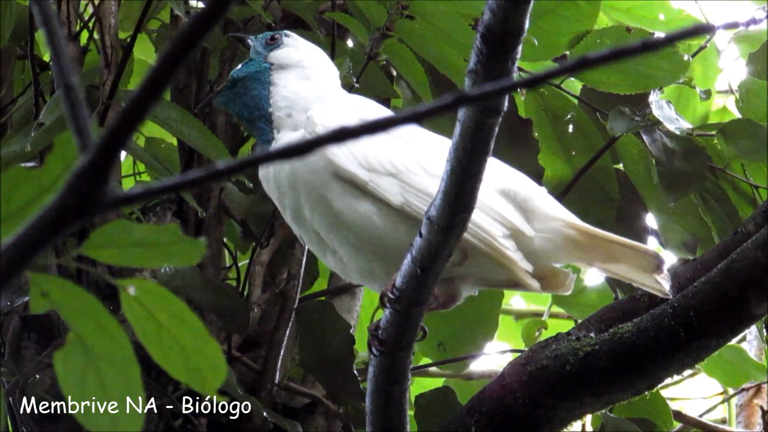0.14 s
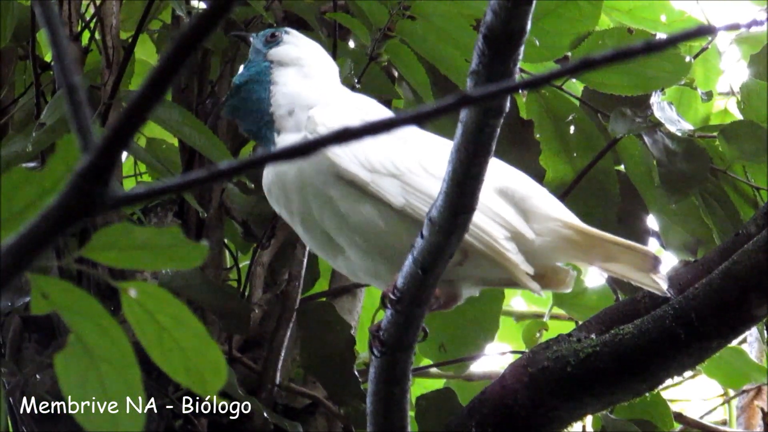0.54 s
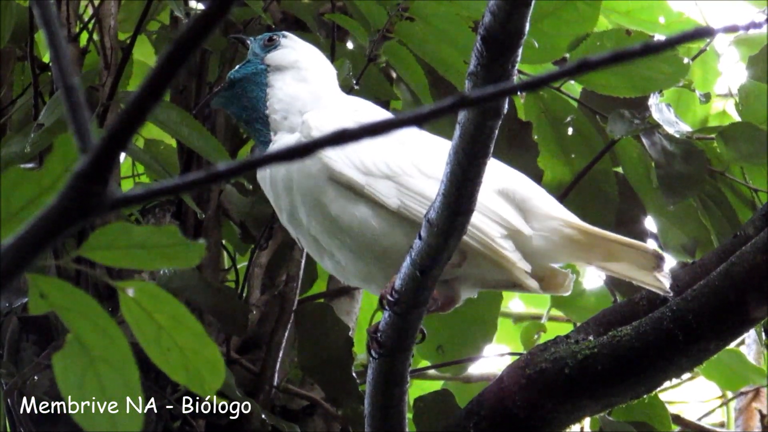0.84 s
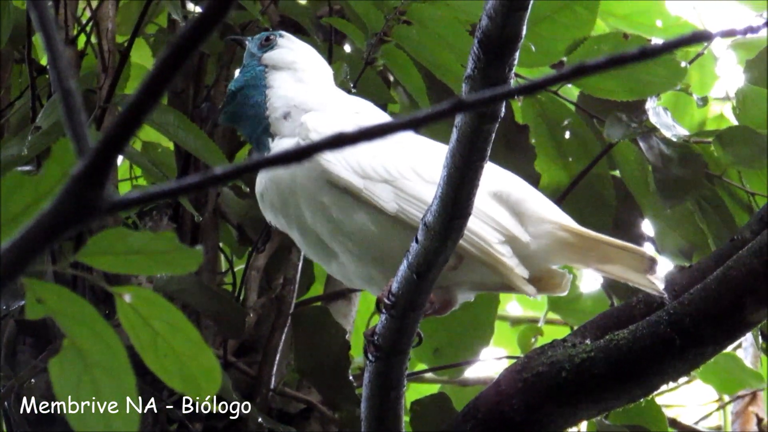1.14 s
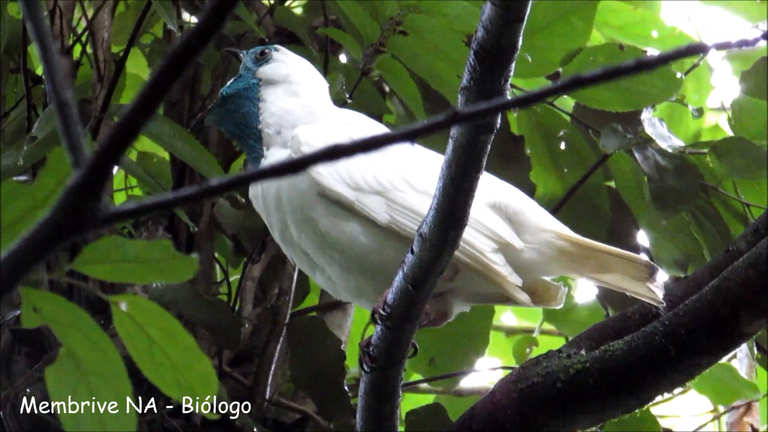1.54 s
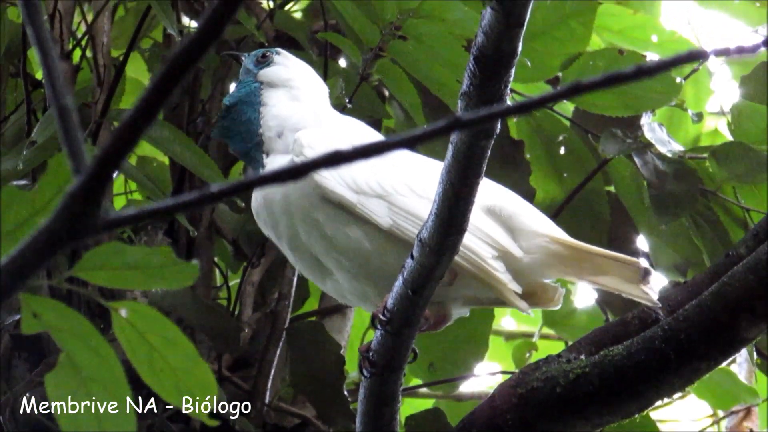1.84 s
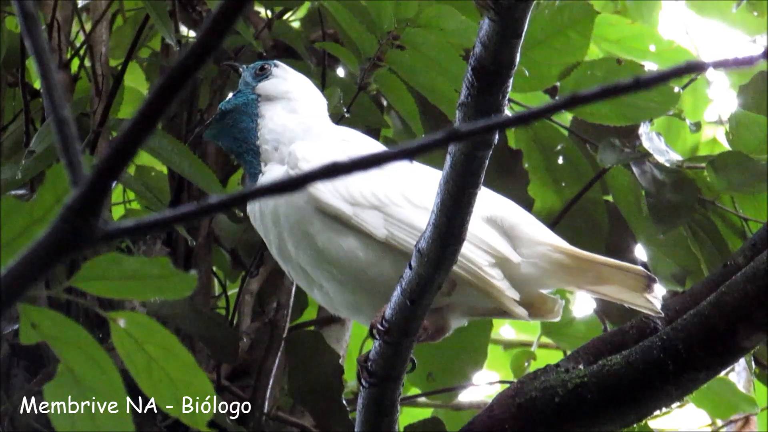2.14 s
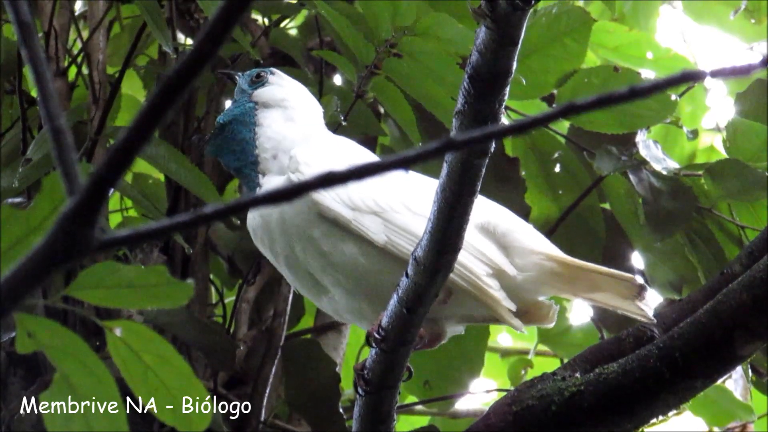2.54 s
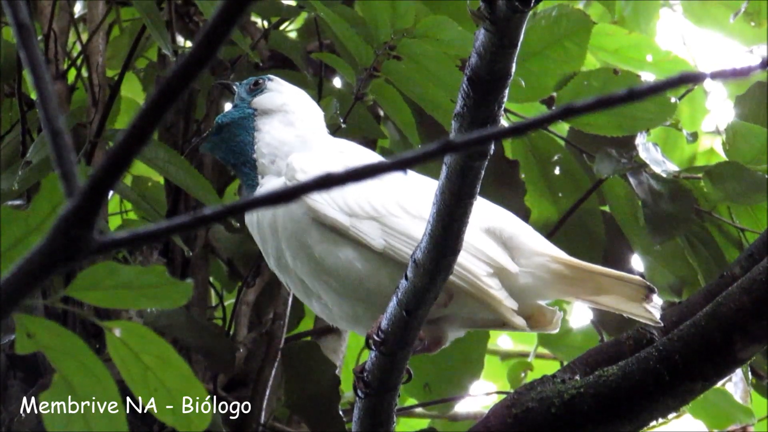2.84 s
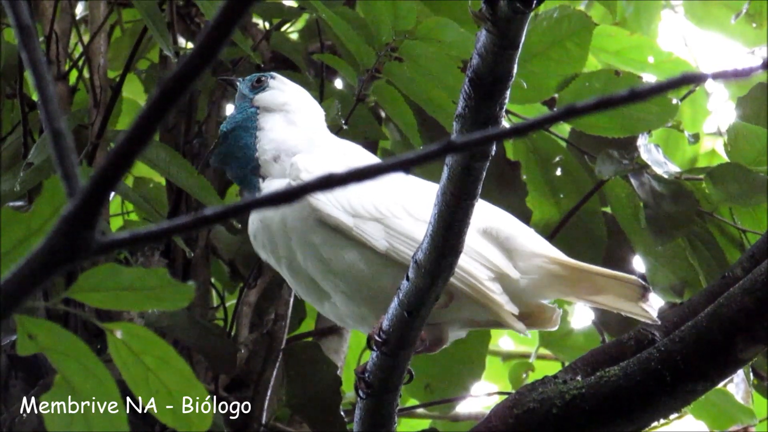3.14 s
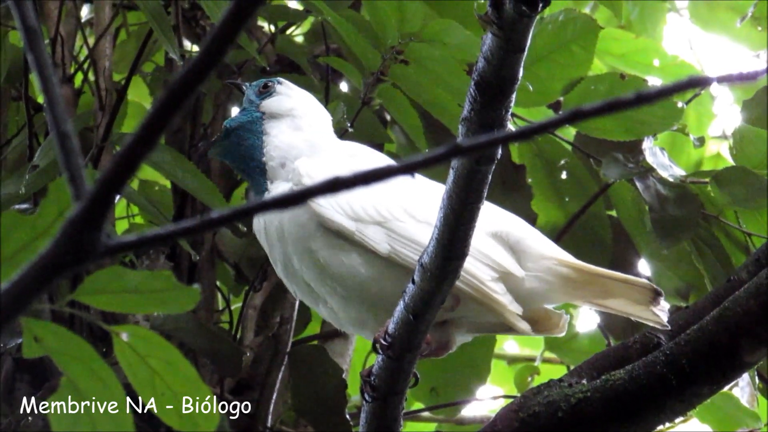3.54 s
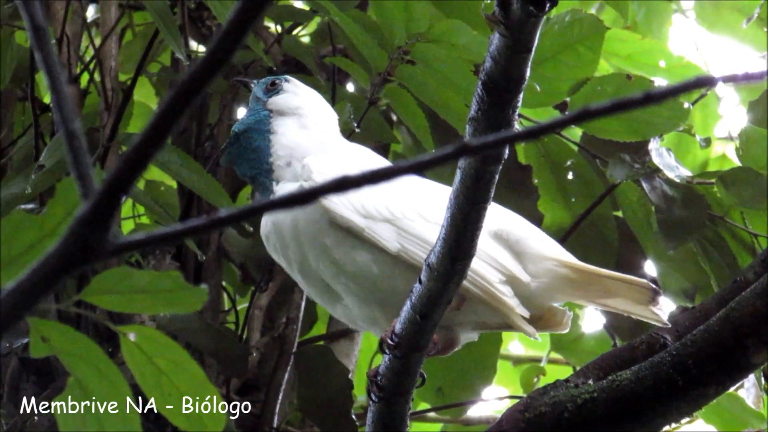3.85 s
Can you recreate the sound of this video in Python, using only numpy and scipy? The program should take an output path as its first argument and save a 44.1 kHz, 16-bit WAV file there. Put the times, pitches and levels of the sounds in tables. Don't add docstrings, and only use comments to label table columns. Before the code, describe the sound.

Close in a forest, a bellbird repeats ringing two-part calls, throbbing clang into short clear whistle, with quick echoes. Faint gliding song, distant chirps, dove coos and breezy leaf hiss lie underneath, captured in wide stereo.

```python
import sys
import numpy as np
from scipy import signal
from scipy.fft import rfft, irfft
from scipy.io import wavfile
from scipy.ndimage import uniform_filter1d

SR = 44100
rng = np.random.default_rng(int(sys.argv[2]) if len(sys.argv) > 2 else 0)


def put_to_file(sound):
    columns = np.atleast_2d(sound).T
    safe = np.clip(columns, -1, 1)
    whole_steps = np.round(safe * 32767)
    wavfile.write(sys.argv[1], SR, whole_steps.astype(np.int16))


def voltage_ratio(decibels):
    exponent = np.asarray(decibels, float) / 20
    return 10 ** exponent


N = 176400
LEAD = 22050
MID_TO_SIDES = np.array([[1], [-1]])
NEAR_ALIKE, FAR_ALIKE = 0.6, 0.45


def clock():
    return (np.arange(N + LEAD) - LEAD) / SR


def rms_one(x):
    return x / np.sqrt(np.mean(x ** 2) + 1e-20)


def along(points, s):
    level_db = np.interp(s, *np.transpose(points), left=-150, right=-150)
    return uniform_filter1d(voltage_ratio(level_db), size=220)


def coloured(spectrum, white):
    log_hz = np.log(np.fft.rfftfreq(white.shape[-1], 1 / SR) + 1)
    at_hz, level_db = np.transpose(spectrum)
    gain = voltage_ratio(np.interp(log_hz, np.log(at_hz), level_db))
    return irfft(rfft(white) * gain, white.shape[-1])


def drift(rate_hz):
    lowpass = signal.butter(2, rate_hz, fs=SR, output="sos")
    return rms_one(signal.sosfilt(lowpass, rng.standard_normal(N + LEAD)))


def panned(pan_db):
    return voltage_ratio([[pan_db / 2], [-pan_db / 2]])


def trees(x, t60_s, alike):
    s = np.arange(SR) / SR
    onset = np.minimum(s / 0.0057, 1)
    mid, side = rng.standard_normal((2, SR)) * voltage_ratio(-60 * s / t60_s) * onset
    tail = np.sqrt(1 + alike) * mid + np.sqrt(1 - alike) * side * MID_TO_SIDES
    tail = tail / np.sqrt(np.sum(tail ** 2) / 2)
    return signal.fftconvolve(x[None], tail, axes=1)[:, :len(x)]


def glides(rows, ease, third_db, rough_db, second_db, order=1.3):
    out, rough = np.zeros(N + 2 * LEAD), np.tanh(drift(170.0))
    for start_s, length_s, from_hz, to_hz, level_db in rows:
        i = int(start_s * SR) + LEAD
        u = np.linspace(0, 1, int(length_s * SR))
        bend = ease * (to_hz > from_hz) * np.sin(2 * np.pi * u) / (2 * np.pi)
        phase = 2 * np.pi * np.cumsum(from_hz + (to_hz - from_hz) * (u - bend)) / SR
        swell = np.sin(np.pi * u ** order) ** 0.7
        gain = voltage_ratio(level_db + 8.0 + rough_db * rough[i // 2:i // 2 + len(u)]) * swell
        tone = np.sin(phase) + voltage_ratio(second_db) * np.sin(2 * phase) + voltage_ratio(third_db) * np.sin(3 * phase)
        out[i:i + len(u)] += gain * tone
    return out[:N + LEAD]


def air():
    # freq_hz, level_db (per Hz)
    bed_spectrum = [(25, -32.5), (65, -2), (150, -6.5), (1900, -16.5), (4500, -6), (6800, -10), (9500, -25),
                    (15500, -42)]
    # freq_hz, likeness (0 to 1)
    likeness = [(40, .998), (85, .993), (125, .8), (300, .6), (1000, .62), (10000, .5)]
    # time_s, level_db
    breeze = [(-.5, -5), (.3, 11), (.6, -0.5), (1.6, 5), (2.0, 1.5), (2.9, -6.5), (3.4, 3.5), (3.6, 9.5),
              (4.1, 6)]
    mid, side = coloured(bed_spectrum, rng.standard_normal((2, N + LEAD)))
    mid = coloured([(hz, 10 * np.log10(1 + c)) for hz, c in likeness], mid)
    side = coloured([(hz, 10 * np.log10(1 - c)) for hz, c in likeness], side)
    both = voltage_ratio(-47) * rms_one(mid + side * MID_TO_SIDES)
    rumble = coloured([(1100, 0), (1800, -60)], both)
    hiss = both - rumble
    gusts = along(breeze, clock()) * voltage_ratio(1.3 * drift(4.7))
    return rumble * voltage_ratio(0.29 * drift(7.5)) + hiss * gusts


def dove():
    # start_s, length_s, from_hz, to_hz, level_db
    coos = [
        (-.1, 0.37, 460.3, 437.8, -52.5),
        (.25, 0.16, 429, 418, -59),
        (.97, 0.49, 445.5, 430, -59.5),
        (1.65, 0.42, 435.6, 432.5, -59),
        (2.03, 0.22, 409, 354, -64.5),
        (2.73, 0.23, 458.8, 434, -60.5),
        (3.82, 0.23, 359, 436, -53.5),
    ]
    return voltage_ratio(-4.0) * glides(coos, ease=0, third_db=-38.5, rough_db=0.55, second_db=-43.0)


def far_chips():
    # start_s, length_s, from_hz, to_hz, level_db
    chips = [(.02, 0.034, 7000, 5050, -44), (.06, 0.067, 4200, 3284, -50.5), (.165, .02, 7000, 5090, -44),
             (.25, 0.036, 6180, 4250, -84.5), (.44, .03, 6600, 5780, -48), (.88, 0.027, 6800, 5550, -56),
             (.91, 0.062, 6710, 5200, -49.5), (1.055, 0.044, 8140, 5490, -46),
             (1.42, 0.014, 7670, 5740, -50), (1.615, 0.013, 8180, 5730, -49.5),
             (1.73, .03, 8750, 4790, -47), (1.82, 0.041, 7050, 6410, -42),
             (1.855, 0.033, 6660, 6150, -35.5), (2.05, 0.063, 8040, 4650, -45),
             (2.1, .04, 8160, 6620, -41.5), (2.16, 0.038, 7810, 3980, -46),
             (2.64, 0.053, 7000, 4700, -45.5), (2.7, 0.034, 7170, 4890, -59),
             (2.93, 0.023, 6230, 5170, -56), (3.085, 0.03, 7280, 5310, -41),
             (3.32, .035, 6420, 4720, -46.5), (3.36, 0.034, 3115, 2380, -54.5),
             (3.38, 0.023, 7290, 4130, -49), (3.47, 0.021, 6960, 4640, -60),
             (3.515, 0.029, 7415, 1916, -48), (3.57, 0.049, 6860, 2157, -65),
             (3.785, 0.034, 7010, 4690, -39), (3.97, 0.015, 4900, 2377, -44),
             (0.26, 0.027, 7650, 6640, -61.5), (0.592, 0.031, 7000, 4520, -47),
             (0.759, .015, 8500, 7500, -75), (1.014, 0.026, 8000, 5900, -56),
             (2.096, 0.016, 14600, 9400, -61.5), (2.871, 0.0099, 1025, 824, -57),
             (2.978, 0.015, 7540, 7000, -57), (2.988, 0.029, 4980, 4440, -61.5),
             (3.32, 0.047, 9170, 8400, -57), (3.502, 0.025, 10120, 8800, -57.5),
             (3.678, 0.036, 10370, 8520, -52.5), (3.945, 0.027, 9670, 9000, -58.5),
             (3.98, 0.028, 8640, 8356, -50), (.03, 0.064, 6900, 6980, -49), (.24, .07, 4740, 4550, -57.5),
             (.1, 0.11, 2260, 1740, -63.5), (3.47, 0.082, 6630, 7550, -60.5)]
    return glides(chips, ease=0, third_db=-74.5, rough_db=4, second_db=-30, order=0.65)


def songbird():
    # start_s, length_s, from_hz, to_hz, level_db
    song_notes = [(.83, 0.06, 4155, 4000, -56.5), (.875, 0.066, 3900, 3527, -40),
                  (1.03, 0.15, 4460, 3160, -38.5), (1.24, 0.14, 4150, 5650, -32.5),
                  (1.455, 0.1, 4200, 5670, -31.5), (1.43, 0.044, 4320, 4184, -37.5),
                  (1.62, 0.067, 3830, 2880, -42.5), (1.683, .035, 4200, 3810, -37),
                  (1.7, 0.058, 3950, 4380, -33.5), (2.0, 0.072, 6120, 5630, -42.5),
                  (2.17, 0.052, 2750, 2740, -46), (2.21, 0.028, 3270, 2510, -43),
                  (2.96, 0.09, 4180, 3985, -57)]
    return glides(song_notes, ease=1.0, third_db=-44.5, rough_db=5.4, second_db=-35.5)


def clang_tone(s, hz, beat, octave_phase, wobble, waver, rasp):
    # offset (in throb rates, rounded to the nearest whole number, halves to even,
    # so -2.5 and 2.5 sound at -2 and 2), level_db
    clang_lines = [(-2.5, -17.5), (-2, -8.5), (-1, 1.5), (0, -1), (1, -10), (2.5, -24.5)]
    scoop_hz = 56.7 * np.clip((-s - 0.01) / 0.02, 0, 1)
    phase = 2 * np.pi * 1583.3 * hz / 3140 * s - 2 * np.pi * np.cumsum(scoop_hz) / SR
    body = 0
    for offset, level_db in clang_lines:
        k = round(offset)
        line_db = level_db + 1.2 * rng.standard_normal()
        body = body + voltage_ratio(line_db) * np.cos(phase + k * beat + 0.46 * (k + 0.5) ** 2)
    dip_db = -8 * np.exp(-((s - 0.029) / 0.024) ** 2)
    octave = voltage_ratio(-4 + dip_db + 1.2 * wobble) * (1 + 0.34 * np.cos(beat + 1.52))
    octave = octave * np.sin(octave_phase + 0.45 * np.sin(beat) + waver)
    throb = ((1 + 0.7 * np.cos(beat)) / 1.15) ** 1.1
    hiss_fade = voltage_ratio(-17 - 114 * np.maximum(s + 0.023, 0))
    hiss = hiss_fade * rasp * voltage_ratio(0.92 * wobble) * (0.5 + 1.55 * throb) * np.clip(s / 0.0061 + 8, 0, 1)
    return voltage_ratio(0.5 * waver - 6.0) * body + octave / 2 + hiss / 2


def whistle_tone(after_s, octave_phase, blurs):
    # multiple, level_db
    overtones = [(2, -31), (3, -38), (4, -43)]
    growth = np.clip((after_s + 0.057 - 0.015) / 0.072, 0.15, 2)
    edge = 0
    for (k, level_db), blur in zip(overtones, blurs):
        edge = edge + voltage_ratio(level_db + 3.5 * blur) * np.sin(k * octave_phase + 0.57 * blur)
    return np.sin(octave_phase) + growth * edge


def bellbird():
    # start_s (of the strongest throb), clang_db, whistle_db, whistle_hz, whistle_delay_s
    calls = [
        (-.19, -9, -4.5, 3144, 0.17),
        (0.5, -11, -6.5, 3120, .15),
        (1.177, -12.5, -6.5, 3136, .15),
        (1.794, -12, -6.5, 3127, .15),
        (2.415, -11, -6, 3130, .15),
        (3.109, -11, -7.5, 3131, 0.15),
        (3.736, -11.5, -5.5, 3150, 0.14),
    ]
    clang_fades = [10, 30, 16, 8.3, 4.7, 21, 25]
    end_bends = [3.3, 7.5, 8.5, 2.4, 2.4, 16.7, 1.3]
    releases = [1.016, 1.095, 1.01, 1.28, 1.16, 0.98, 1.07]
    whistle_returns = [(-20.5, -14.5, -57, -28.5), (-60, -17.5, -39, -30.5), (-17.5, -17, -57, -31),
                       (-40, -32, -28.5, -35.5), (-43.5, -17.5, -52, -31), (-20, -16, -23, -34),
                       (-45.5, -18.5, -32, -30)]
    # delay_s, pan_db, clang_db
    banks = [
        (0.043, -7, -11),
        (0.094, -1.5, -18.5),
        (0.15, 0, -26.5),
        (0.23, -4, -29),
    ]
    # time_s, throbs before the strongest
    first_throbs = [(-.1, -7), (-.057, -4), (-.042, -3), (-.025, -2), (-.0148, -1), (0, 0)]
    # time_s, level_db
    clang_shape = [(-.064, -61), (-.054, -23.5), (-.034, -13), (-.018, -4), (0, -2), (.03, -3.5),
                   (.085, -7.5), (.125, -23.5), (.16, -41.5)]
    # time_s, level_db
    whistle_shape = [(-.08, -38), (-.05, -13), (-.032, -2), (-.014, -0.3), (0, 2), (.024, -0.5), (.048, -6),
                     (.062, -13.5), (.072, -59)]
    # freq_hz, level_db (per Hz)
    rasp_spectrum = [(550, -37.5), (1100, -9.5), (2000, -24.5), (2560, -5.5), (3700, -16.5), (4180, 0.5),
                     (5400, -9.5), (15000, -42)]

    total = N + LEAD
    clang, whistle, echoes = np.zeros(N + SR), np.zeros(N + SR), np.zeros((2, N + SR))
    chance = [rms_one(coloured(rasp_spectrum, rng.standard_normal(total)))]
    chance += [drift(rate_hz) for rate_hz in (40.0, 48.0, 35.0, 21.0, 25.0)]
    s = np.arange(2 * SR // 5) / SR - 0.1
    for call, returns, release, fade_db, end_hz in zip(calls, whistle_returns, releases, clang_fades, end_bends):
        start_s, clang_db, whistle_db, hz, delay_s = call
        i = int(start_s * SR) + LEAD - SR // 10
        rasp, wobble, waver, *blurs = (np.take(c, i + np.arange(len(s)), mode="wrap") for c in chance)
        throbs = 77.74 * np.maximum(s, 0) + np.interp(s, *np.transpose(first_throbs))
        beat = 2 * np.pi * (throbs + 0.025 * wobble)
        after_s = s - delay_s
        u = np.clip(after_s / 0.037, -1.5, 1.5)
        bend_hz = np.where(u < 0, 24.8 * (u > -1.5), end_hz) * u ** 2
        octave_phase = 2 * np.pi * np.cumsum(hz + bend_hz) / SR

        clang_gain = voltage_ratio(clang_db + 6 - fade_db * np.maximum(s, 0)) * along(clang_shape, s)
        low = clang_gain * clang_tone(s, hz, beat, octave_phase, wobble, waver, rasp)
        swell = along(whistle_shape, after_s / np.where(after_s > 0, release, 1))
        tone = voltage_ratio(whistle_db) * whistle_tone(after_s, octave_phase, blurs)
        core = tone * swell ** 1.83
        clang[i:i + len(s)] += low
        whistle[i:i + len(s)] += tone * swell
        for (lag_s, pan_db, clang_echo_db), whistle_echo_db in zip(banks, returns):
            j = i + int(lag_s * SR)
            echo = voltage_ratio(clang_echo_db) * low + voltage_ratio(whistle_echo_db) * core
            echoes[:, j:j + len(s)] += echo * panned(pan_db)
    return clang[:total], whistle[:total], echoes[:, :total]


def scene():
    clang, whistle, out = bellbird()
    song, far, coo = songbird(), far_chips(), dove()
    out = out + clang * panned(1.2 * 1) * 0 + clang * voltage_ratio([[0.6], [-0.6]]) + whistle + song * panned(1)
    highpass = signal.butter(4, 7000, "high", fs=SR, output="sos")
    treble = signal.sosfilt(highpass, clang + whistle)
    out += voltage_ratio(-5) * treble * MID_TO_SIDES
    out += voltage_ratio(-20) * np.roll(clang, 7) * MID_TO_SIDES
    out += trees(voltage_ratio(-17.5) * clang + voltage_ratio(-23) * whistle, 1, NEAR_ALIKE)
    out += trees(voltage_ratio(-2) * song, 0.45, NEAR_ALIKE)
    out += far * voltage_ratio(-0.5) + coo * 1.05
    out += trees(voltage_ratio(8) * far + 0.4 * coo, 0.52, FAR_ALIKE)
    out += air()
    return out[:, LEAD:]


def top_cut(x):
    return signal.sosfilt(signal.butter(12, 15820, fs=SR, output="sos"), x)


def record(dry):
    return top_cut(dry)


dry = scene()
out = record(dry)
put_to_file(out)
```